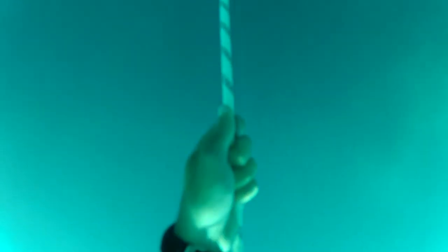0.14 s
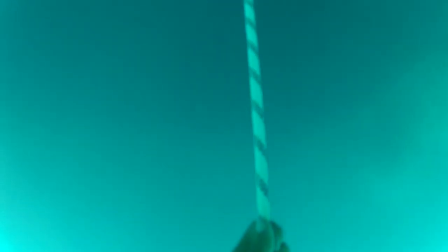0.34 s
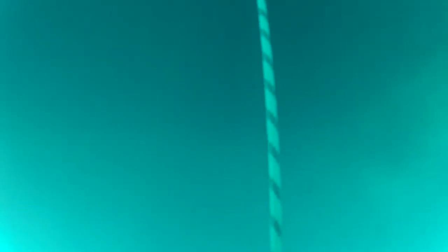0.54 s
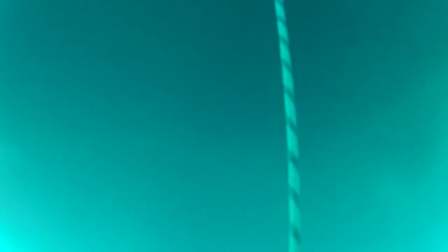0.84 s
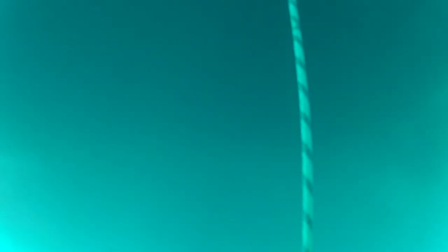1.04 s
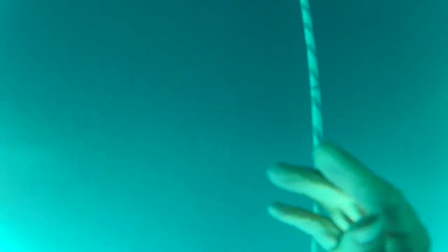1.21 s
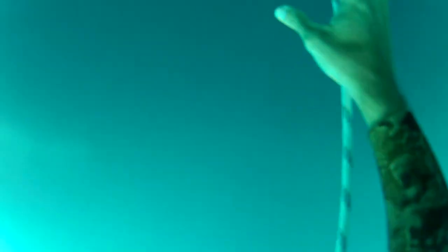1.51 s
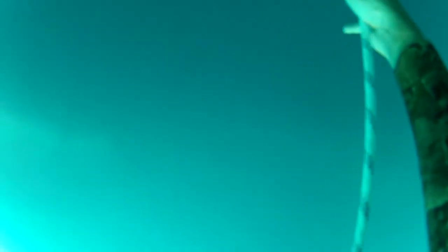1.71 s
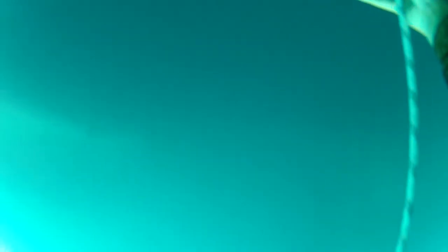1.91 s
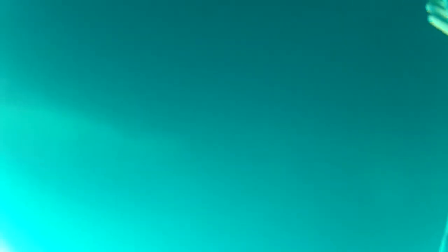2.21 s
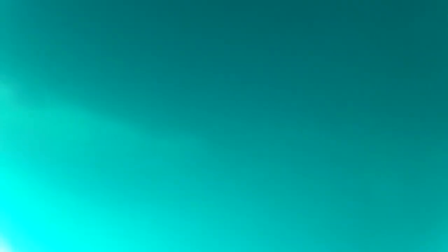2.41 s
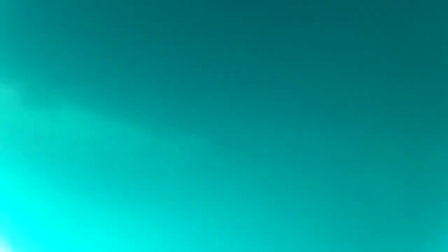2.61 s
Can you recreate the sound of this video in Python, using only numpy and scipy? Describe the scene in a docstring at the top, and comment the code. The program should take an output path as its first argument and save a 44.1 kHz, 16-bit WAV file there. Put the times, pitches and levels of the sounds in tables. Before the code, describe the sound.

Dull underwater knocks on a plastic camera housing, with a short shrill strap creak and bubbles

```python
"""Under water, close in at a camera's plastic housing, as a diver hauls along a rope; 2.75 s.
Lumpy water rumble (shaped noise), thin hiss and stray bubbles run throughout as the background.
From the start soft thumps (short sliding tones) and dry ticks (noise bursts); knocks at 0.48 and 0.97 s
come with bubbles (rising tones) and grainy rubbing (resonant noise). From 1.53 to 1.71 s a strap creaks
in a run of slips (ringing modes); at 2.2 s the hardest thumps, then bubbles and a last rub.
At the microphone a coarse sample-and-hold mirrors it all into the treble."""
import sys
import numpy as np
from scipy import signal
from scipy.fft import irfft
from scipy.io import wavfile
from scipy.ndimage import uniform_filter1d

SR = 44100
rng = np.random.default_rng(int(sys.argv[2]) if len(sys.argv) > 2 else 0)


def dump(signal):
    """Clip the signal to [-1, 1] and save it as 16-bit WAV at the path in sys.argv[1]."""
    limited = np.clip(np.atleast_2d(signal).T, -1, 1)
    pcm = np.round(limited * 32767).astype(np.int16)
    wavfile.write(sys.argv[1], SR, pcm)


N = 121275  # samples, 2.75 s


def amp(db):
    """Turn decibels into an amplitude factor."""
    return 10 ** (np.asarray(db) / 20)


def evened(x):
    """Scale to an RMS of 1."""
    return x / np.sqrt(np.mean(x ** 2) + 1e-20)


def read(points, hz):
    """Read a curve of (f/Hz, value) points along a logarithmic frequency axis."""
    f, value = np.transpose(points)
    return np.interp(np.log(hz + 1), np.log(f + 1), value)


def add(mix, start_s, sound):
    """Lay a sound into the mix at its start time, cut off at the end."""
    part = mix[max(round(start_s * SR), 0):][:len(sound)]
    part += sound[:len(part)]


def resonate(x, hz, width):
    """A fixed resonance of gain 1: shift its band to zero, smooth with one pole, shift back."""
    turn = np.exp(2j * np.pi * hz * np.arange(len(x)) / SR)
    pole = np.exp(-np.pi * width / SR)
    smoothed = signal.lfilter([1 - pole], [1, -pole], x / turn)
    return 2 * (turn * smoothed).real


def blip(db, hz, length, skew, glide):
    """A few cycles that swell and fade while the pitch slides; skew below 1 puts the peak early."""
    u = np.arange(0, length, 1 / SR) / length
    swell = np.sin(np.pi * u ** skew) ** 2
    pitch = hz * (1 + glide * (u - .5))
    return amp(db) * swell * np.sin(2 * np.pi * np.cumsum(pitch) / SR)


def ring(hz, db, t60):
    """A struck mode: a sine that decays exponentially, by 60 dB in t60 seconds."""
    t = np.arange(3000) / SR
    return amp(db - 60 * t / t60) * np.sin(2 * np.pi * hz * t)


# Low thumps on the housing: start t/s, peak level/dB, mid-slide f/Hz, length t/s
HOUSING_THUMPS = [(.0, -38, 150, 0.029), (0.137, -37.5, 170, 0.0152), (0.257, -38.5, 90, 0.012),
                  (0.317, -39, 80, 0.022), (0.374, -27.5, 165, 0.017), (0.475, -20, 258, 0.0223),
                  (0.477, -35.5, 443, 0.028), (.49, -32.5, 143, 0.0228), (0.508, -34, 260, .03),
                  (0.528, -30, 220, 0.023), (0.571, -29, 338, 0.0167), (.6, -38, 338, 0.058),
                  (.601, -37, 180.7, 0.059), (0.63, -44, 250, 0.046), (0.92, -34.5, 150, 0.043),
                  (0.947, -28, 190, 0.026), (0.971, -18, 155, 0.017), (0.993, -21.5, 155, 0.013),
                  (1.024, -29.5, 169, 0.016), (1.037, -34.5, 110, 0.017), (1.245, -44.5, 193, 0.032),
                  (1.31, -39.5, 130, 0.015), (1.44, -38.5, 148, 0.00506), (1.61, -47, 131, 0.039),
                  (1.698, -30.5, 219, .014), (1.713, -38.5, 284, 0.025), (1.757, -33.5, 310, 0.0094),
                  (1.793, -48.5, 300, 0.0425), (1.933, -33.5, 184, 0.01315), (2.199, -13, 297, 0.014),
                  (2.2015, -3, 304.4, 0.033), (2.197, -14, 190, 0.022), (2.193, -27.5, 95, .05),
                  (2.27, -46, 205, .03), (2.2287, -4, 237.5, 0.013), (2.237, -22, 190, 0.032),
                  (2.253, -34, 200, 0.033), (2.325, -40, 110, 0.027), (2.328, -41.5, 420, 0.016),
                  (2.457, -34, 105, 0.0218), (2.587, -42, 70, .03), (2.736, -41, 200, .015)]


def thump(db, hz, length):
    """A knock on the housing: a low tone whose pitch sags a little as it swells and fades."""
    return blip(db, hz, length, skew=0.84, glide=-0.087)


# Slips of the strap: start t/s, main shrill mode f/Hz, level/dB, second shrill mode f/Hz, level/dB,
# main shrill t60 t/s, stiffening mode f/Hz, level/dB, shell level/dB, snap level/dB
STRAP_SLIPS = [(1.5272, 3386, -7, 3600, -11.5, 0.014, 1167, -16.5, -23.5, -55),
               (1.5423, 3280, -14.5, 3680, -11, 0.0157, 1130, -16, -21, -48),
               (1.5639, 3360, -6.5, 3698, -8.5, 0.014, 1150, -13.5, -22.5, -38.5),
               (1.59, 3724, -12.5, 3520, -6.5, 0.024, 1260, -15, -21, -53),
               (1.6, 3390, -31, 3760, -19, 0.019, 1180, -20, -39, -22),
               (1.6105, 3610, -11.5, 3900, -32, 0.0087, 1310, -20.5, -29, -28.5),
               (1.6266, 3584, -10, 3425, -5.5, 0.017, 1225, -15.5, -21.5, -30),
               (1.6495, 3550, -21.5, 3900, -15, 0.018, 1363, -15, -29.5, -30.5),
               (1.6576, 3470, -24.5, 3870, -16.5, .02, 1390, -19.5, -26.5, -20.5),
               (1.6655, 3620, -13, 3907, -15.5, .02, 1408, -16, -27, -33),
               (1.6772, 3250, -22.5, 3766, -23, .022, 1600, -19.5, -23, -32),
               (1.689, 3433, -21, 3690, -28.5, 0.016, 1910, -19, -24.5, -23.5),
               (1.7024, 3470, 4.5, 3857, -3, 0.0098, 2183, -16, -26, -16.5),
               (1.709, 3314, -29.5, 3862, -29.5, 0.0096, 2100, -31, -40, -29.5)]
# Modes of the housing shell: f/Hz, level/dB added to the slip's shell level, t60 t/s
SHELL_MODES = [(786, -31, .015), (921, -3, 0.033), (958.4, -2.5, 0.039), (1590, 6, 0.0057),
               (1902, -0.5, .012), (2160, -18.5, .012), (5469, -24.5, 0.0033)]
SHRILL_RISE_S, BODY_RISE_S = 0.00046, 0.00015
STIFF_T60, SNAP_T60 = 0.016, 0.016  # s
SECOND_LASTS = 0.57  # the second shrill mode dies sooner: share of the main t60
DIP_HZ, DIP_WIDTH_HZ, STRAP_LOW_HZ = 2590, 430, 740


def slip(hz_a, db_a, hz_b, db_b, shrill_t60, stiff_hz, stiff_db, shell_db, snap_db):
    """One slip rings two beating shrill modes, a mode that stiffens along the creak, and the shell."""
    t = np.arange(3000) / SR
    shrill = ring(hz_a, db_a, shrill_t60) - ring(hz_b, db_b, SECOND_LASTS * shrill_t60)
    shrill = shrill * (1 - np.exp(-t / SHRILL_RISE_S)) ** 2
    shell = sum(ring(hz, shell_db + db, t60) for hz, db, t60 in SHELL_MODES)
    snap = amp(snap_db - 60 * t / SNAP_T60) * rng.standard_normal(3000)
    body = (ring(stiff_hz, stiff_db, STIFF_T60) + shell + snap) * (1 - np.exp(-t / BODY_RISE_S))
    body = body - resonate(body, DIP_HZ, DIP_WIDTH_HZ)
    no_bass = signal.butter(N=8, Wn=STRAP_LOW_HZ, btype="high", fs=SR, output="sos")
    return signal.sosfilt(no_bass, shrill + body)


# Bubbles: start t/s, peak level/dB, mid-slide f/Hz, length t/s
SINGLE_BUBBLES = [(.005, -47.5, 1020, 0.013), (0.482, -39.5, 1064, 0.024), (.478, -46.5, 1300, 0.024),
                  (.488, -48, 990, 0.026), (0.522, -50, 960, 0.022), (0.514, -47, 1050, 0.0173),
                  (0.574, -58, 915, 0.0074), (.581, -46.5, 1045, 0.012), (0.932, -45.5, 780, 0.012),
                  (0.942, -33, 680, 0.0066), (0.95, -36, 870, 0.0063), (0.978, -46, 1310, 0.0071),
                  (1.004, -33.5, 910, 0.0049), (1.006, -23.5, 1175, 0.0031), (1.021, -42.5, 660, 0.0295),
                  (1.027, -24.5, 760, 0.00167), (1.199, -52, 1290, 0.0091), (1.211, -55.5, 1150, .008),
                  (1.223, -57, 1590, .012), (1.249, -43, 960, 0.011), (1.25, -53.5, 1350, 0.042),
                  (1.326, -52, 900, 0.0073), (1.37, -46.5, 712, 0.0089), (1.393, -52.5, 1020, 0.022),
                  (1.435, -46, 1080, 0.014), (1.467, -43, 1106, 0.0035), (1.512, -38.5, 860, 0.0082),
                  (1.75, -49, 1690, 0.0053), (1.768, -49.5, 990, 0.007), (1.852, -56, 928, 0.056),
                  (1.974, -29.5, 815, 0.0054), (1.977, -43, 930, 0.014), (1.978, -39.5, 405, 0.0077),
                  (2.014, -56, 1667, 0.026), (2.072, -52.5, 830, 0.0073), (2.127, -52, 1600, 0.016),
                  (2.302, -44.5, 2180, 0.00554), (2.33, -32.5, 703, .008), (2.336, -34, 900, 0.0094),
                  (2.344, -56.5, 2130, 0.0087), (2.378, -45.5, 2450, 0.0042), (2.494, -57.5, 1476, 0.031),
                  (2.656, -39.5, 785, 0.0071), (2.681, -40, 815, 0.009), (2.694, -40, 803, 0.0104),
                  (2.721, -55, 1950, 0.028)]


def bubble(db, hz, length):
    """A popping bubble: a short tone, early to peak, that rises in pitch."""
    return blip(db, hz, length, skew=0.33, glide=0.14)


# Dry ticks: start t/s, nominal level/dB, centre f/Hz
DRY_TICKS = [(.058, -38, 3120), (.338, -41, 3740), (.357, -43.5, 3320), (.478, -28, 1850),
             (.941, -25.5, 4500), (.9415, -40, 2860), (1.004, -28.5, 1460), (1.016, -38, 1980),
             (1.028, -41, 1670), (1.078, -33, 3500), (1.0785, -37, 2000), (1.24, -41.5, 3400),
             (1.428, -43.5, 3960), (1.768, -36, 2600), (1.88, -45, 2490), (1.911, -46.5, 4200),
             (1.934, -31.5, 1660), (1.959, -39, 3726), (1.972, -32, 2590), (1.974, -28.5, 1220),
             (2.329, -36, 1210), (2.365, -53, 1510), (2.64, -60.5, 2023), (2.583, -48, 2030),
             (.018, -40.5, 2120), (.825, -46.5, 3000), (1.091, -45, 3570), (1.12, -43, 2500),
             (1.465, -41.5, 2480)]
TICK_T60, TICK_RISE_S = .012, 0.00064  # s
TICK_WIDTH = .55  # bandwidth as a share of the centre frequency


def tick(db, hz):
    """A short burst of noise in a wide band, with a quick rise and an exponential decay."""
    t = np.arange(1200) / SR
    noise = rng.standard_normal(1200)
    for _ in range(2):
        noise = resonate(noise, hz, TICK_WIDTH * hz)
    # the noise RMS starts 7.5 dB under the nominal level
    decay = amp(db - 7.5 - 60 * t / TICK_T60)
    return evened(noise) * decay * (1 - np.exp(-t / TICK_RISE_S))


# Rubbing of skin and rope: start t/s, length t/s, hiss level/dB, tilt in dB per octave, scrub level/dB
SKIN_ROPE_RUBS = [(.424, 0.05, -60, 11, -83), (.478, 0.0633, -57.5, 3.5, -38.5),
                  (.575, 0.077, -65.5, -0.5, -43), (.928, 0.055, -56, -3.5, -46),
                  (1.003, 0.015, -44, -12, -42), (1.018, 0.016, -40.5, -12.5, -52),
                  (1.19, 0.082, -64, -2.5, -61.5), (1.58, .24, -65, -2, -48),
                  (2.198, 0.036, -59.5, -4.5, -30), (2.29, 0.042, -59.5, 2, -73.5),
                  (2.335, 0.052, -61, -2, -52), (2.656, 0.055, -52.5, -8.5, -57)]
# Resonances that colour the rubbing hiss: f/Hz, width f/Hz, level/dB before the tilt
RUB_RESONANCES = [(680, 250, -9), (941, 300, 1), (1456, 170, -2.5), (2064, 390, 2.5), (3770, 880, -4.5)]
SCRUB_HZ, SCRUB_WIDTH_HZ, RUB_EDGE_S, RUB_GRAIN_DB = 290, 150, 0.0034, 4


def rub(length, hiss_db, tilt_db, scrub_db):
    """Friction through the housing: noise of grainy level drives a resonant hiss and a low scrub."""
    hiss_noise, scrub_noise, grain_noise = rng.standard_normal((3, 12000))
    t = np.arange(0, length, 1 / SR)
    grain = amp(RUB_GRAIN_DB * evened(uniform_filter1d(grain_noise, size=60)))
    hiss = 0
    for hz, width, db in RUB_RESONANCES:
        band = resonate(resonate(hiss_noise * grain, hz, width), hz, width)
        hiss = hiss + amp(db + tilt_db * np.log2(hz / 2000)) * evened(band)
    scrub = resonate(scrub_noise * grain, SCRUB_HZ, SCRUB_WIDTH_HZ)
    scrub = evened(resonate(scrub, SCRUB_HZ, SCRUB_WIDTH_HZ))
    edges = np.clip(np.minimum(t, length - t) / RUB_EDGE_S, 0, 1)
    return edges * (amp(hiss_db) * evened(hiss) + amp(scrub_db) * scrub)[:len(t)]


FIZZ_PER_S, FIZZ_DB, FIZZ_SPREAD_DB = 60, -70, 1


def fizz():
    """Faint stray bubbles at random times, with random level, pitch and length."""
    out = np.zeros(N)
    for when, size, pitch, length in rng.random((400, 4)):
        start_s = when * 400 / FIZZ_PER_S
        if start_s < N / SR:
            db = FIZZ_DB - FIZZ_SPREAD_DB * np.log(size + .01)
            add(out, start_s, bubble(db, 600 * 4.5 ** pitch, .004 + 0.0042 * length))
    return out


# Spectrum of the water, only its shape counts: f/Hz, level/dB per Hz
WATER_SPECTRUM = [(12, -28.5), (20, 4.5), (67, -5), (202, -8.5), (323, -16.5), (449, -23), (849, -32.5),
                  (1080, -29), (1610, -35.5), (1810, -31), (2450, -36), (5600, -43), (7280, -86),
                  (12300, -120)]
# Surge of the rumble, only the swing about its mean counts: t/s, level/dB
WATER_SURGE = [(0.0, -48.5), (0.31, -52.5), (0.5, -47.5), (0.96, -54.5), (1.76, -47), (1.92, -49.5),
               (2.02, -51.5), (2.75, -50)]
WATER_DB = -49  # RMS level before the surge
LUMPS_DB, HISS_LUMPS_DB = 2, 2.48  # unevenness: extra in the bass, and at all frequencies


def water():
    """Lumpy low rumble that surges, over a thin hiss: noise shaped frame by frame in the spectrum."""
    frames = N // 256 + 5
    hz = np.fft.rfftfreq(1024, 1 / SR)
    real, imag, lumps = rng.standard_normal((frames, 513, 3)).T
    # smooth the lumps over frequency, then over time
    lumps = uniform_filter1d(lumps, size=8, axis=0)
    lumps = evened(uniform_filter1d(lumps, size=4, axis=1))
    lump_db = HISS_LUMPS_DB + LUMPS_DB / (1 + (hz[:, None] / 500) ** 2)
    s, db = np.transpose(WATER_SURGE)
    surge_db = np.interp(np.arange(frames) * 256 / SR, s, db - db.mean())
    surge_db = surge_db / (1 + (hz[:, None] / 700) ** 2)  # the hiss hardly surges
    spectrum = (real + 1j * imag) * amp(read(WATER_SPECTRUM, hz)[:, None] + lump_db * lumps)
    steady = signal.istft(spectrum, nperseg=1024, noverlap=768)[1][:N]
    surging = signal.istft(spectrum * amp(surge_db), nperseg=1024, noverlap=768)[1][:N]
    return amp(WATER_DB) / steady.std() * surging


def scene():
    """Water and stray bubbles, with every timed sound laid on top; one channel."""
    mix = water() + fizz()
    for table, source in ((HOUSING_THUMPS, thump), (STRAP_SLIPS, slip), (SINGLE_BUBBLES, bubble),
                          (DRY_TICKS, tick), (SKIN_ROPE_RUBS, rub)):
        for start_s, *row in table:
            add(mix, start_s, source(*row))
    return mix[None]


def low_pass(x, edge_hz):
    """A steep band limit."""
    taps = signal.firwin(401, edge_hz, window=("kaiser", 8), fs=SR)
    return signal.oaconvolve(x, taps[None], "same")


# Treble response of the microphone: f/Hz, level/dB
MICROPHONE_TREBLE = [(6000, 1), (9000, 1), (12000, 0.5), (14000, 2), (15200, -5.5), (15700, -22),
                     (16600, -20)]
HOLD_HZ, SOURCE_EDGE_HZ, EDGE_HZ = 12000, 5850, 16700
HISS_DB = -87.5  # RMS before the final band limit


def record(dry):
    """Sampled coarsely and held: the band repeats, mirrored, around the sampling rate; then band-limited."""
    t = np.arange(N) / SR
    sampled = low_pass(dry, SOURCE_EDGE_HZ) * (1 + 2 * np.cos(2 * np.pi * HOLD_HZ * t))
    hz = np.fft.rfftfreq(513, 1 / SR)
    # the hold dulls the treble as a sinc; a gentler sinc lifts part of it back
    droop = np.sinc(hz / HOLD_HZ)
    lift = np.sinc(np.minimum(hz, HOLD_HZ / 2) / HOLD_HZ / 2)
    response = droop / lift * amp(read(MICROPHONE_TREBLE, hz))
    taps = np.roll(irfft(response, 513), 256) * np.hanning(513)
    held = signal.oaconvolve(sampled, taps[None], "same")
    hiss = amp(HISS_DB) * rng.standard_normal(dry.shape)
    return low_pass(held + hiss, EDGE_HZ)


dry = scene()
out = record(dry)
dump(out)
```